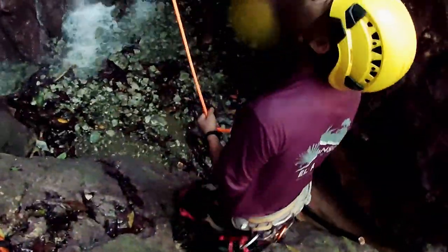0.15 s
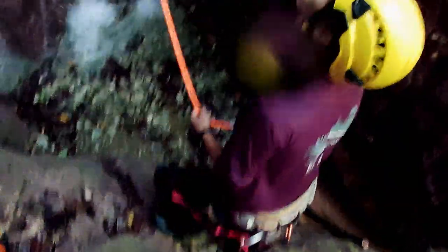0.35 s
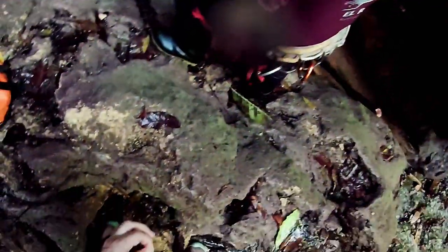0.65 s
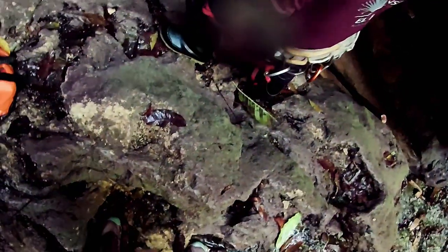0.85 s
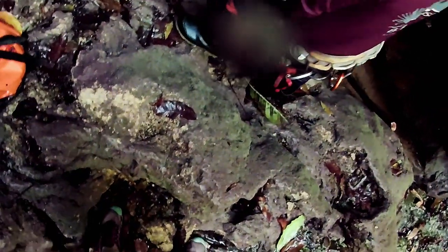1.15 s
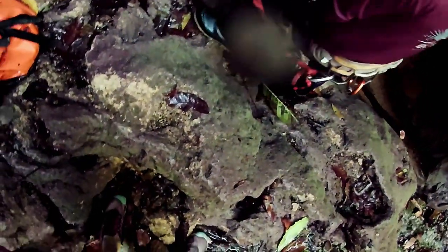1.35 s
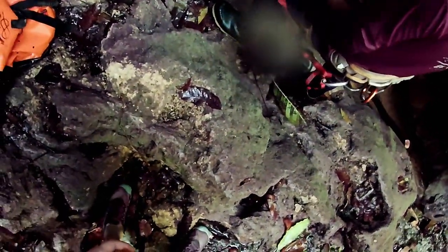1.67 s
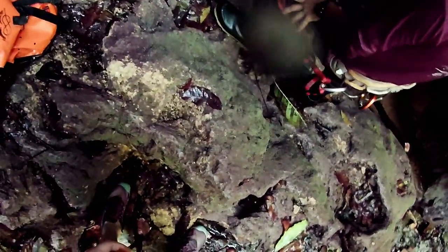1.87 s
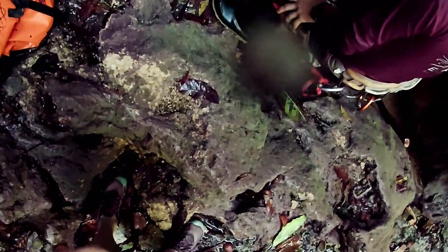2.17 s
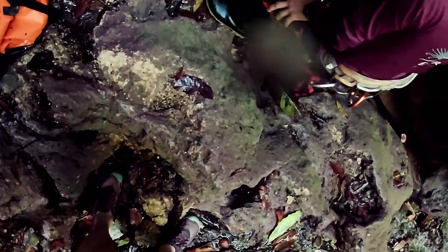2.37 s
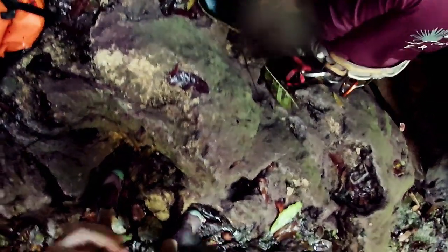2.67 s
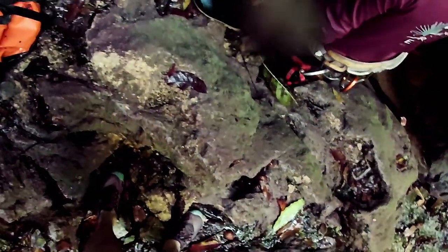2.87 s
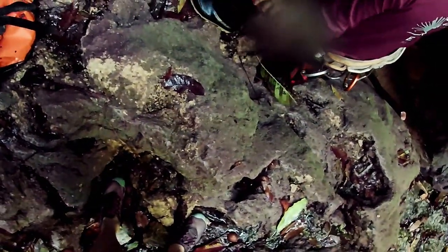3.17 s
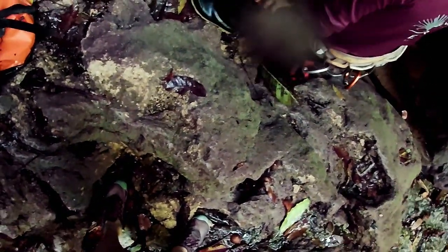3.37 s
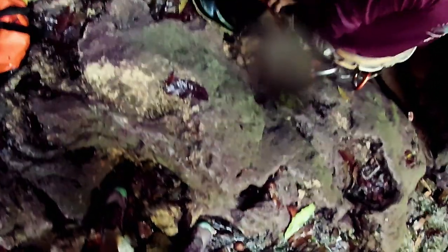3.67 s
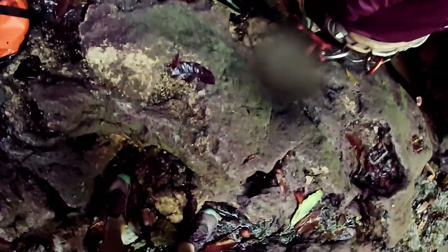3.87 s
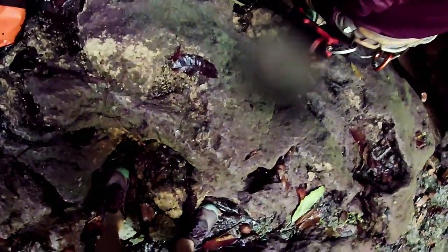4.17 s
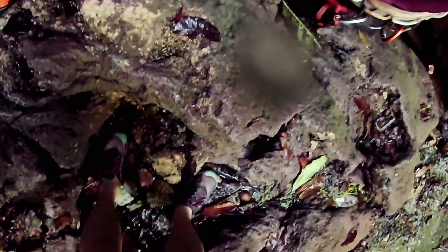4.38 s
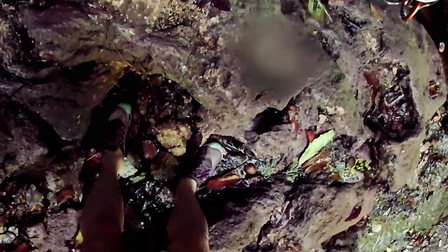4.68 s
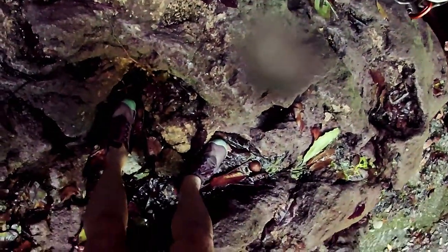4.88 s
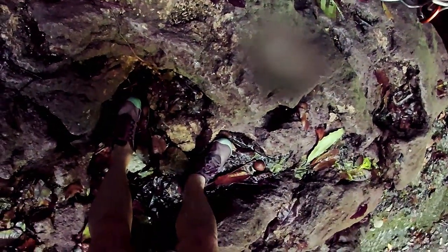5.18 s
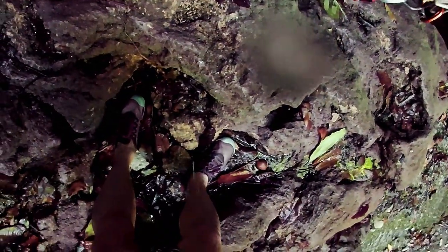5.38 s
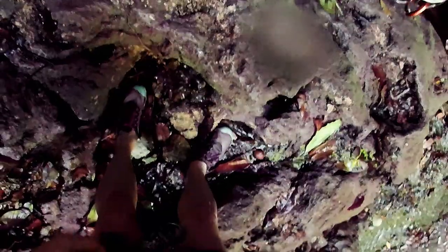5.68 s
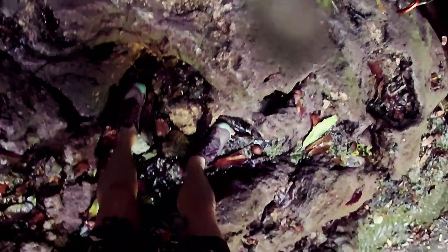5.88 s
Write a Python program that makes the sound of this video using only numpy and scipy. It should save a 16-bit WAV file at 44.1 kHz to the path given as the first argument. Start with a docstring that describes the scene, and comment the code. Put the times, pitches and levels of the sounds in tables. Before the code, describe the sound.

A waterfall rushes steadily into a rock pool, heard through a worn, cased camera with low mount rumble and one heavy early jolt.

```python
"""A waterfall pours steadily into a rock pool, below a small cased camera worn by someone standing on a ledge.
Filtered noise makes the spray and short rising tones make the bubbles and gurgles; echoes add fine strands.
The case colours the rush, and the colour shifts as the camera tilts from the pool to the rock and to the feet.
The wearer's movements shake the mount: low noise for rumble and strap rubs, short low sways for the jolts
(a heavy one at the first tilt), longer sways for slow heaves, and fading tones for a few soft knocks."""
import sys
import numpy as np
from scipy import signal
from scipy.fft import rfft, irfft, next_fast_len
from scipy.io import wavfile
from scipy.ndimage import uniform_filter1d, map_coordinates

SR = 44100
rng = np.random.default_rng(int(sys.argv[2]) if len(sys.argv) > 2 else 0)


def to_wav(sig):
    """Store sig (one row per channel, or 1-D mono) as 16-bit WAV at the path in sys.argv[1].

    Samples outside -1..1 are clipped; the rate is SR.
    """
    pcm = np.clip(np.atleast_2d(sig), -1, 1) * 32767
    pcm = np.round(pcm).astype(np.int16)
    wavfile.write(sys.argv[1], SR, pcm.T)  # frames by channels


N = 266143  # length in samples, about 6 seconds

# Tone of the falling water. Each row: pitch in Hz, relative level in dB.
WATER_TONE = [(20, -28), (100.0, -3), (250.0, -5.5), (500.0, -4), (700.0, -1.5), (1000.0, 0.1),
              (1600.0, 0.5), (2300.0, -3.5), (4700.0, -10.5), (7400.0, -10), (8200.0, -19.5),
              (10000.0, -26.5), (12000.0, -31.5), (15700.0, -34.5)]
# Splashes that each flutter on their own. Each row: centre in Hz, width in Hz, flutter scale in dB.
SPLASHES = [(4350, 4100, .5), (8460, 5200, 0.5)]
# Ringing (+) and dull spots (-) of the camera case and the rock around it.
# Each row: centre in Hz, width in Hz, boost or cut in dB.
CASE_TONE = [(179, 41, 5), (276, 55, 5), (400, 57, 2.5), (461, 69, -4.5), (1073, 133, 4), (1249, 220, 4.5),
             (1843, 228, 7.5), (2110, 170, 6), (2310, 180, 0.5), (2907, 465, -7.5), (2965, 143, -8),
             (3468, 440, 7.5), (4107, 325, 5.5), (5370, 290, 6)]
# What reflections add and cancel when the camera faces the pool, the rock or the feet.
# Each row: centre in Hz, width in Hz, boost or cut in dB.
TOWARD_POOL = [(418, 430, -4), (1990, 1400, -3), (2800, 170, 0), (3110, 220, 7.5), (3600, 200, -4),
               (4000, 1540, -3), (5580, 180, -12), (6120, 230, 8.5), (8850, 1000, -10), (9630, 410, 8)]
TOWARD_ROCK = [(540, 120, -3), (3100, 200, 2), (6660, 900, 3), (8620, 300, 7.5)]
TOWARD_FEET = [(1160, 50, -0.5), (1296, 98, 2.5), (2910, 1400, 3.5), (3470, 220, -1), (4340, 200, 4),
               (8430, 260, 6.5), (8960, 880, -4.5), (9900, 219, 4)]
# Where the camera faces. Each row: time in seconds, direction (0 pool, 1 rock, 2 or more feet).
TILT = [(0, 0.068), (.3, 0.13), (.5, 0.75), (3.6, 1.32), (4.5, 2), (6.03, 2.6)]
# Level of the rush's hollow middle band. Each row: time in seconds, boost or cut in dB.
HOLLOW = [(0, 5), (.27, 2.5), (.41, 7.5), (.68, 3.5), (1.3, 2.5), (2.35, 0.7), (2.75, 2.3), (3.08, 0.5),
          (3.25, -1), (3.5, 0.2), (3.9, -0.5), (4.6, 1), (6.03, 0.5)]
# Level of the high sizzle in the rush. Each row: time in seconds, boost or cut in dB.
SIZZLE = [(0, 0), (.3, -3), (.5, 4), (.9, 2), (1.3, 0.5), (2.2, -1.5), (2.88, 3), (3.3, 1.5), (3.7, -1),
          (4.4, -3), (5.2, -2), (6.03, 1.5)]
# The whole rush swells and eases a little. Each row: time in seconds, boost or cut in dB.
SWELL = [(.22, -2.5), (.5, 0), (1.3, -0.5), (2.85, 0), (3.08, 0), (3.22, -2.3), (3.36, 0), (4.3, -0.5),
         (4.75, 0.9), (5.4, -0.5)]
# Tone of the mount's rumble. Each row: pitch in Hz, relative level in dB.
MOUNT_TONE = [(4, 1.5), (13, 1), (22, 6.5), (31, -6.5), (45, -6), (60, -15.5), (80, -23.5), (110, -32.5),
              (170, -32), (400, -84)]
# How much the wearer stirs. Each row: time in seconds, rumble level in dB.
STIR = [(0, -19.5), (.3, -32), (.6, -27), (.85, -30), (1.15, -30.5), (1.5, -42), (1.75, -30.5),
        (2.3, -28.5), (2.85, -27.5), (3.4, -32), (3.9, -29), (4.4, -32.5), (5.35, -32.5), (5.65, -28.5),
        (6.03, -28.5)]
# The strap rubs on the mount. Each row: middle in seconds, length in seconds, rms level in dB, centre in Hz.
RUBS = [(0.64, 0.079, -44, 110), (1.708, 0.056, -44, 720), (2.736, .12, -42.5, 60),
        (2.887, 0.16, -41.5, 60.3), (4.202, 0.069, -49.5, 397), (5.56, 0.14, -45, 59.7),
        (5.935, 0.15, -46, 60)]
# The camera sways on its mount. Each row: middle in seconds, peak in dB, sway in Hz, length in seconds.
JOLTS = [(0.071, -35, 38, .04), (0.381, -24, 38.3, 0.029), (0.461, -1.3, 24, 0.025),
         (.505, -16, 41.3, 0.061), (0.584, -25, 44.3, 0.055), (0.735, -27, 35, .04),
         (.938, -30.5, 49, .045), (1.319, -24, 40.7, 0.037), (1.672, -28.5, 46, 0.02),
         (1.846, -29, 45, 0.033), (1.961, -27, 39, 0.048), (2.033, -27, 41.2, 0.032),
         (2.114, -14, 25.2, 0.025), (2.463, -24.5, 45.4, .055), (2.782, -21.5, 35.4, 0.04),
         (2.901, -31, 47, 0.037), (2.953, -21.5, 38, .04), (3.224, -29, 51, 0.024),
         (3.344, -24, 39.2, 0.062), (3.747, -32, 46.3, 0.052), (3.925, -28, 41.6, 0.053),
         (3.982, -27, 47.4, 0.036), (4.372, -31, 48, 0.033), (4.75, -26, 47.6, 0.057),
         (5.126, -27, 50, 0.052), (5.508, -24.5, 47.4, 0.039), (5.891, -28, 48, 0.027),
         (5.981, -31, 52, 0.028)]
# Shifts of weight heave the whole mount slowly.
# Each row: middle in seconds, peak in dB, sway in Hz, length in seconds.
HEAVES = [(.484, -7, 13.9, .1), (0.583, -13.5, 9.5, .1), (2.829, -27, 13.4, 0.26), (5.675, -25.5, 7, 0.18)]
# Soft knocks on the case.
# Each row: start in seconds, level before the soft attack in dB, pitch in Hz, time to fade by 60 dB in seconds.
KNOCKS = [(.165, -27, 273, 0.049), (.455, -22, 377, 0.044), (0.582, -10, 94, 0.038),
          (2.753, -25.5, 384, 0.05), (3.058, -30.5, 112, 0.11), (3.323, -13.5, 85, 0.045),
          (4.369, -30.5, 172, 0.075), (4.85, -33.5, 85, 0.2), (5.09, -27.5, 336, 0.058)]

RUSH_DB = -38
# Gurgles: their level, how often their strength changes (points a second), and how far it swings.
GURGLE_DB, GURGLE_RATE, GURGLE_SWING_DB = -21, 10, 4
# The pool's low churn comes and goes with the gurgles.
CHURN_HZ, CHURN_WIDTH_HZ, CHURN_SWING_DB = 530, 163, 2
# Echoes from nearby rocks: level of each, shortest and longest delay, and drift as the wearer shifts.
ECHO_DB, ECHO_NEAR_S, ECHO_FAR_S, ECHO_DRIFT_S = -24.5, .008, .026, 0.000253
# A closer echo off the wearer's helmet: level, delay, drift, and the band that it throws back.
HELMET_DB, HELMET_S, HELMET_DRIFT_S = -15.5, .004, .00013
HELMET_HZ, HELMET_WIDTH_HZ = 5400, 5200
HOLLOW_HZ, HOLLOW_WIDTH_HZ = 1166, 210
SIZZLE_HZ, SIZZLE_WIDTH_HZ = 7040, 420
KNOCK_ATTACK_S = .004
TOP_HZ = 15750  # the camera keeps only what lies below this


def amp(db):
    """Turn decibels into a plain multiplier."""
    return 10 ** (np.asarray(db) / 20)


def unit(x):
    """Scale a sound to an rms level of 1."""
    return x / np.sqrt(np.mean(x ** 2) + 1e-20)


def clock():
    """The time of every sample, in seconds."""
    return np.arange(N) / SR


def curve(rows):
    """Join (time, value) rows with straight lines, giving one value per sample."""
    return np.interp(clock(), *np.transpose(rows))


def along(points, hz):
    """Read (Hz, value) points on a log pitch axis."""
    f, v = np.transpose(points)
    return np.interp(np.log(hz + 1), np.log(f + 1), v)


def bell(x, centre, width):
    """A smooth hump of height 1, with its width taken at half height."""
    return 2 ** -(2 * (x - centre) / width) ** 2


def humps(rows, hz):
    """Combined gain of a set of boosts and cuts across pitch."""
    return amp(sum(db * bell(hz, centre, width) for centre, width, db in rows))


def filtered(x, response):
    """Change the level of each pitch in a sound by the given response."""
    padded = next_fast_len(N + SR // 2)
    spectrum = rfft(x, padded)
    return irfft(spectrum * response(np.fft.rfftfreq(padded, 1 / SR)), padded)[:N]


def wobble(rate):
    """A smooth random flutter of rms 1 with no slow drift, through `rate` points a second."""
    points = np.diff(rng.standard_normal(int(N * rate / SR) + 5))
    return unit(map_coordinates(points, [clock() * rate]))


def spray(patchy_db):
    """Hissing noise in which patches of pitch swell and fade as lumps of water land."""
    noise = signal.stft(rng.standard_normal(N), nperseg=512)[2]
    patches = uniform_filter1d(rng.standard_normal(noise.shape), size=7, axis=0)  # smooth across pitch
    patches = uniform_filter1d(patches, size=14, axis=1)  # smooth across time
    patchy_noise = noise * amp(patchy_db * unit(patches))
    return unit(signal.istft(patchy_noise, nperseg=512)[1][:N])


def bubbles(count, centre_hz, spread, cycles, rise, size_db):
    """Air pockets ring for some cycles, rising in pitch as they near the surface."""
    when, pitch, size = rng.random((count, 3)).T[:, :, None]
    hz = centre_hz * 2 ** (spread * (2 * pitch - 1))  # spread is in octaves each way
    k = np.arange(SR // 50)  # each pocket sounds for at most 20 ms
    age = k / SR * hz / cycles  # 1 once the given number of cycles has gone by
    tone = np.sin(2 * np.pi * cycles * age * (1 + rise * np.minimum(age, 2) / 2))
    ring = tone * np.exp(-2 * age) * (1 - np.exp(-20 * age))
    strength = amp(size_db * np.minimum(-np.log(1 - size), 5))  # a few are much stronger
    places = (when * N).astype(int) + k
    return unit(np.bincount(places.ravel(), (strength * ring).ravel(), N)[:N])


def waterfall():
    """Spray, bubbles and gurgles in the pool; the falling sheet surges and its splashes flutter."""
    water = spray(patchy_db=1.0)
    water = water + amp(-15.0) * bubbles(count=3600, centre_hz=1405, spread=2.133, cycles=18.3,
                                         rise=0.1, size_db=1.5)
    plunge = wobble(GURGLE_RATE)
    churn = filtered(water, lambda hz: bell(hz, CHURN_HZ, CHURN_WIDTH_HZ))
    gurgles = bubbles(count=1100, centre_hz=1406.4, spread=0.813, cycles=24, rise=0.12, size_db=0.8)
    gurgles = unit(amp(GURGLE_SWING_DB * plunge) * gurgles)
    water = water + churn * (amp(CHURN_SWING_DB * plunge) - 1) + amp(GURGLE_DB) * gurgles
    for centre, width, depth_db in SPLASHES:
        splash = filtered(water, lambda hz: bell(hz, centre, width))
        flutter = wobble(17) + 1.48 * wobble(45)
        water = water + splash * (amp(depth_db * flutter) - 1)
    surge = amp(0.2 * wobble(17) + 0.16 * wobble(40))
    return filtered(water * surge, lambda hz: amp(along(WATER_TONE, hz)))


def off_rocks(water):
    """Weak echoes from rocks and helmet comb the rush into fine strands that drift as the wearer shifts."""
    t = clock()
    out = water
    for place in rng.random(size=6):
        delay = ECHO_NEAR_S + place * (ECHO_FAR_S - ECHO_NEAR_S) + ECHO_DRIFT_S * wobble(1)
        out = out + amp(ECHO_DB) * np.interp(t - delay, t, water)
    treble = filtered(water, lambda hz: bell(hz, HELMET_HZ, HELMET_WIDTH_HZ))
    helmet_delay = HELMET_S + HELMET_DRIFT_S * wobble(1)
    return out + amp(HELMET_DB) * np.interp(t - helmet_delay, t, treble)


def through_case(water):
    """The case rings with the rush; tilting fades from one pattern of reflections to the next."""
    inside = filtered(water, lambda hz: humps(CASE_TONE, hz))
    tilt = np.clip(curve(TILT), 0, 2)
    heard = np.zeros(N)
    for place, pattern in enumerate([TOWARD_POOL, TOWARD_ROCK, TOWARD_FEET]):
        share = np.clip(1 - abs(tilt - place), 0, 1)
        heard += share * unit(filtered(inside, lambda hz: humps(pattern, hz)))
    return heard


def band_level(rush, levels, centre_hz, width_hz):
    """One band of the rush swells and eases along a curve."""
    band = filtered(rush, lambda hz: bell(hz, centre_hz, width_hz))
    return rush + band * (amp(curve(levels)) - 1)


def rumble():
    """The wearer's stirring shakes the mount in lumps of low noise, and now and then the strap rubs."""
    shake = unit(filtered(rng.standard_normal(N), lambda hz: amp(along(MOUNT_TONE, hz))))
    lumps = unit(amp(1.2 * wobble(12)))
    out = shake * lumps * amp(curve(STIR))
    for s, length, db, centre in RUBS:
        rub = unit(filtered(rng.standard_normal(N), lambda hz: bell(hz, centre, 1.3 * centre)))
        out += rub * amp(db) * bell(clock(), s, length)
    return out


def sway(s, db, hz, length):
    """A rocking motion that swells and dies around the moment s."""
    t = clock()
    return -amp(db) * bell(t, s, length) * np.cos(2 * np.pi * hz * (t - s))


def jolts():
    """Each jolt rocks the camera briefly; each heave rocks the mount more slowly."""
    return sum(sway(*row) for row in JOLTS + HEAVES)


def knocks():
    """Padded contacts ring the case briefly and dully, with a soft attack and a quick fade."""
    out = np.zeros(N)
    for s, db, hz, t60 in KNOCKS:
        t = np.maximum(clock() - s, 0)
        attack = (1 - np.exp(-t / KNOCK_ATTACK_S)) ** 2
        out -= amp(db - 60 * t / t60) * attack * np.sin(2 * np.pi * hz * t)
    return out


def scene():
    """Add the water heard through the air to the handling felt through the mount."""
    rush = through_case(off_rocks(waterfall()))
    rush = band_level(rush, HOLLOW, HOLLOW_HZ, HOLLOW_WIDTH_HZ)
    rush = band_level(rush, SIZZLE, SIZZLE_HZ, SIZZLE_WIDTH_HZ)
    rush = amp(RUSH_DB + curve(SWELL)) * rush
    return (rush + rumble() + jolts() + knocks())[None]  # one channel


def record(dry):
    """The camera keeps nothing at or above its band limit."""
    return np.array([filtered(channel, lambda hz: hz < TOP_HZ) for channel in dry])


dry = scene()
out = record(dry)
to_wav(out)
```